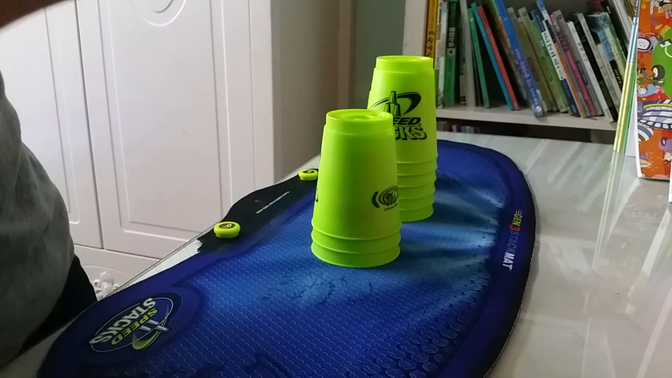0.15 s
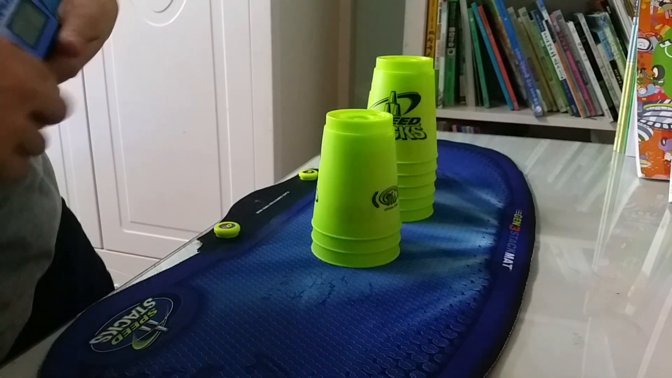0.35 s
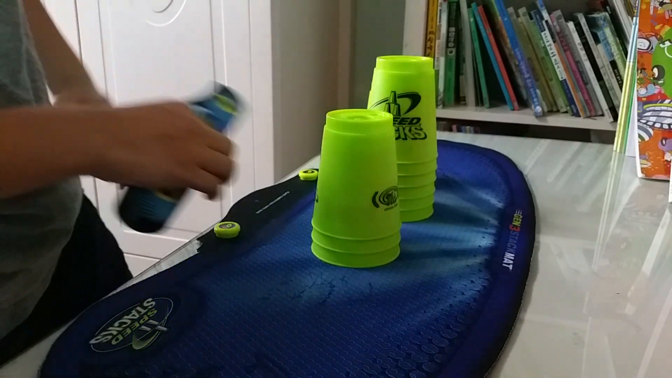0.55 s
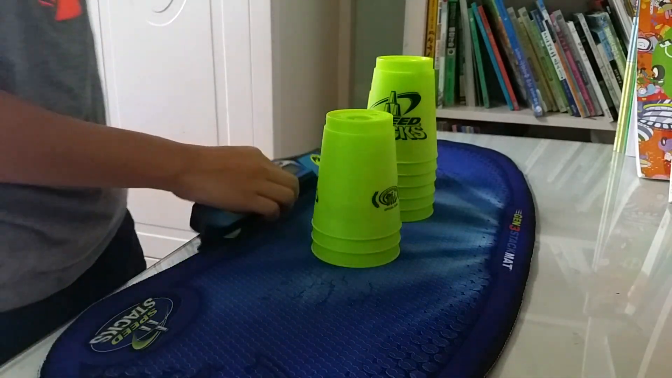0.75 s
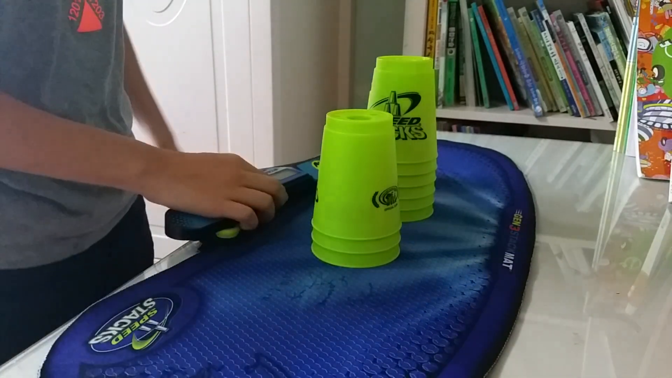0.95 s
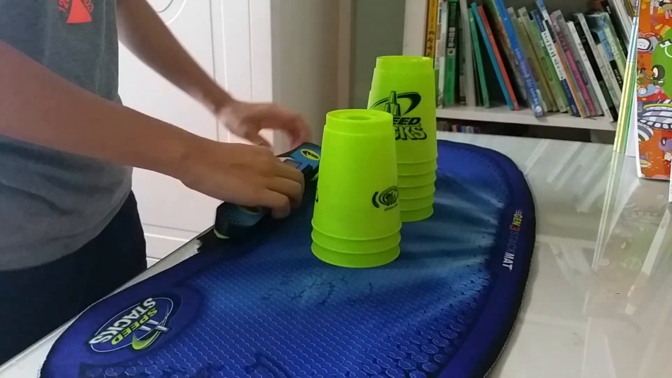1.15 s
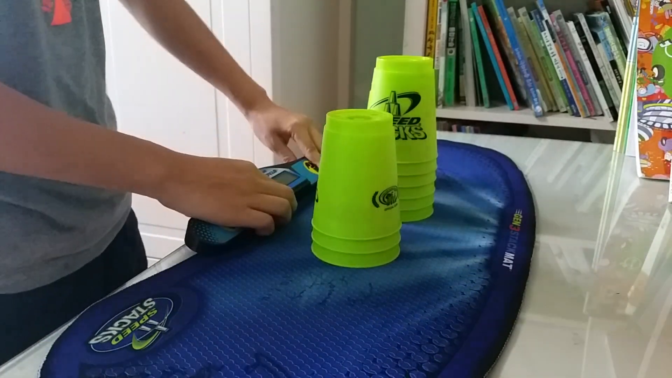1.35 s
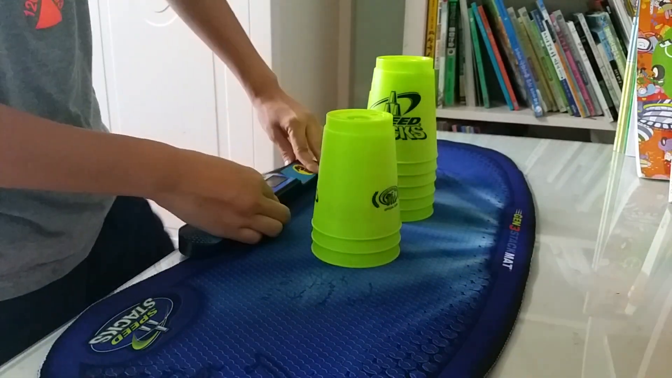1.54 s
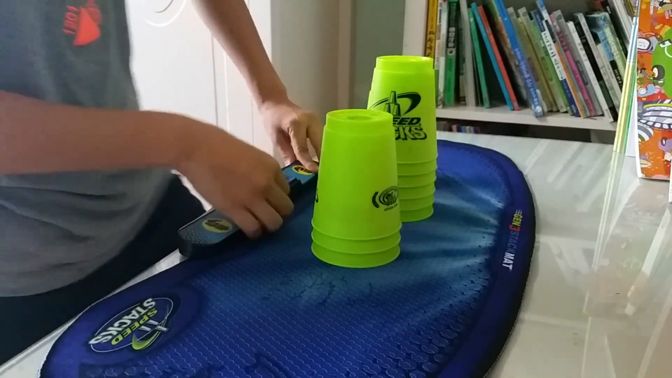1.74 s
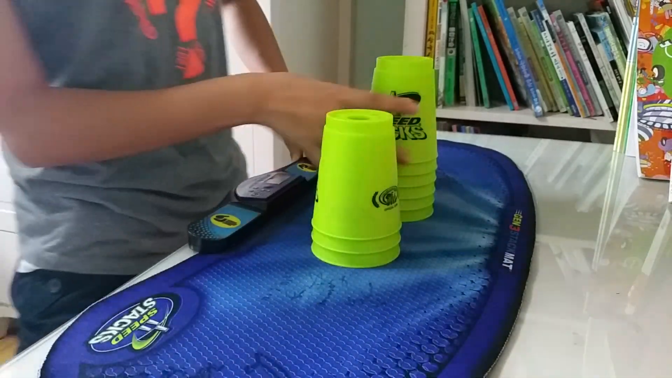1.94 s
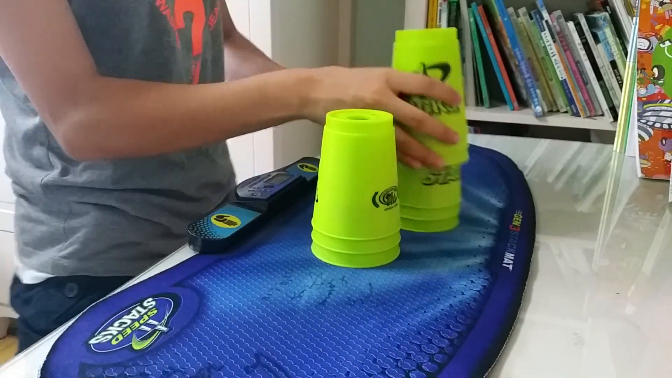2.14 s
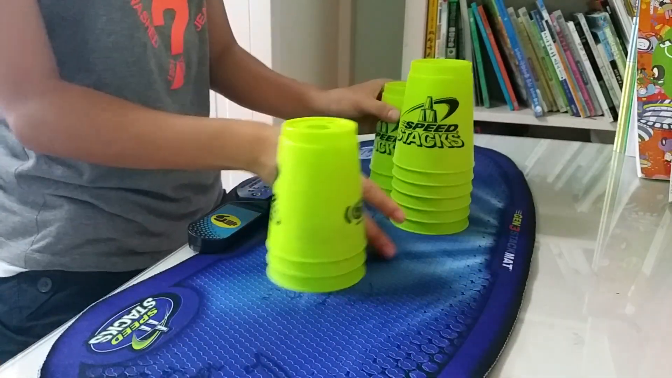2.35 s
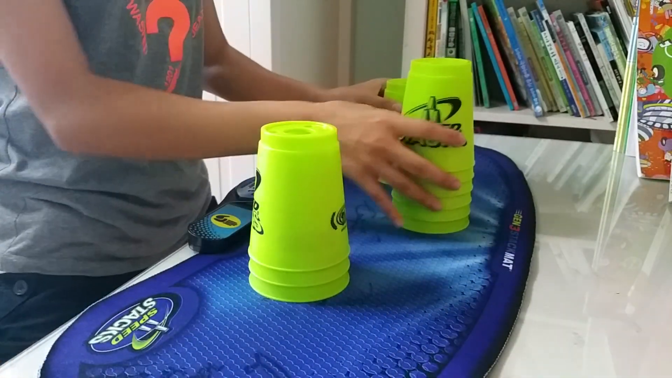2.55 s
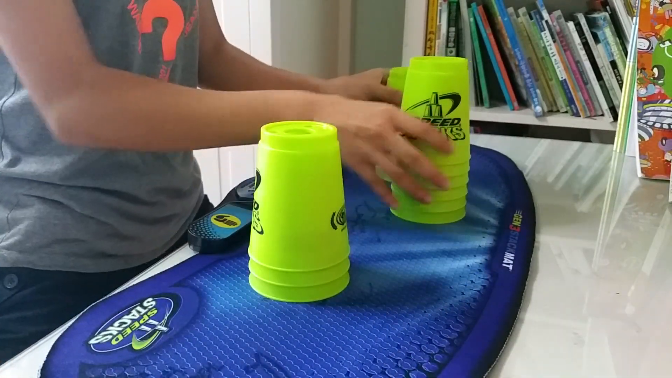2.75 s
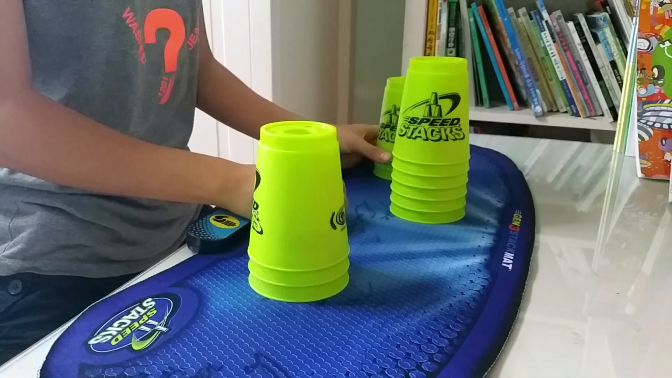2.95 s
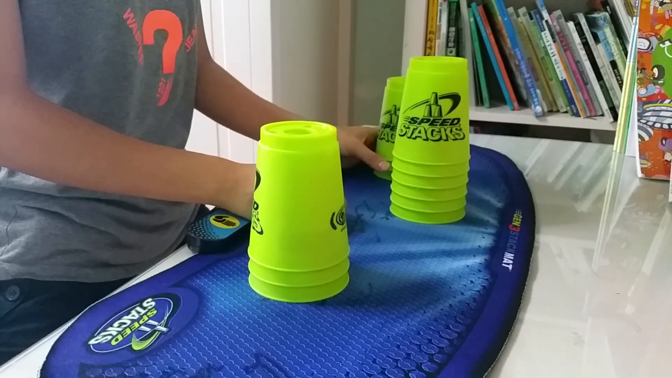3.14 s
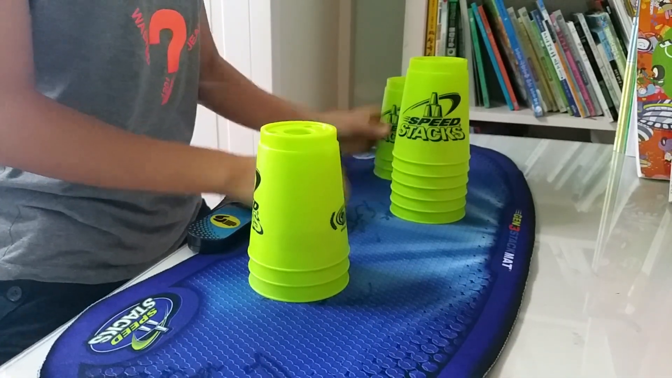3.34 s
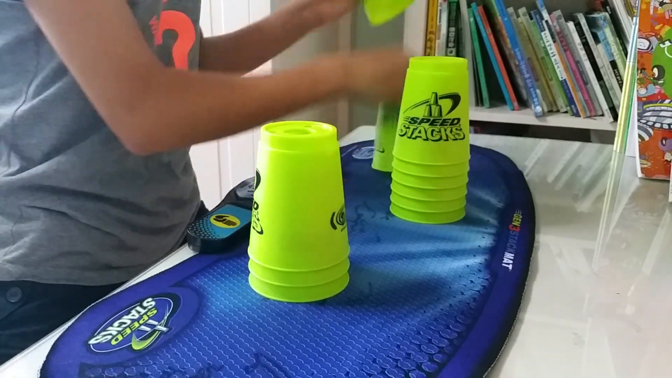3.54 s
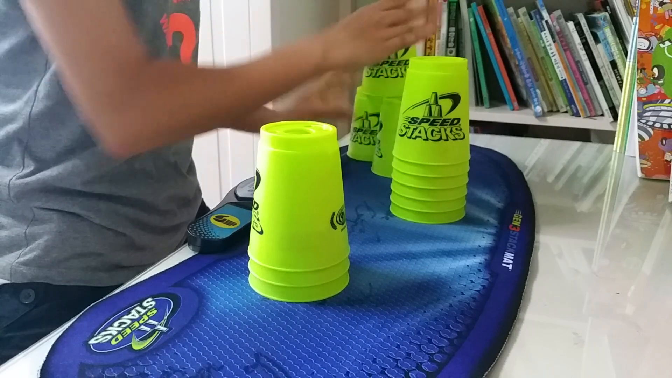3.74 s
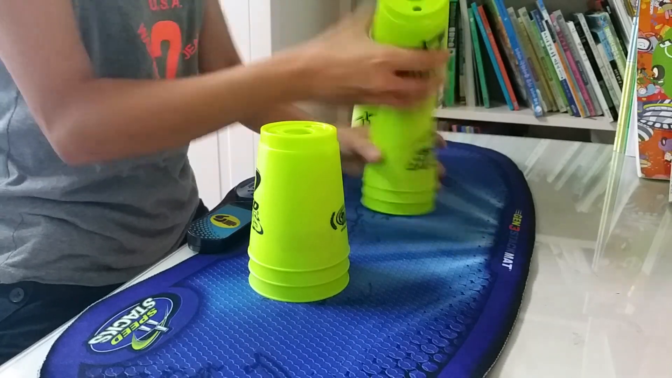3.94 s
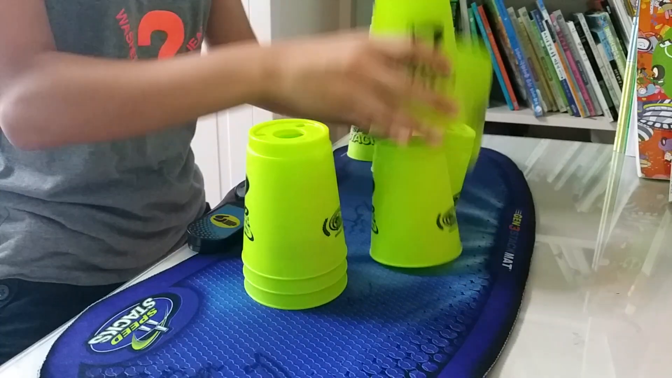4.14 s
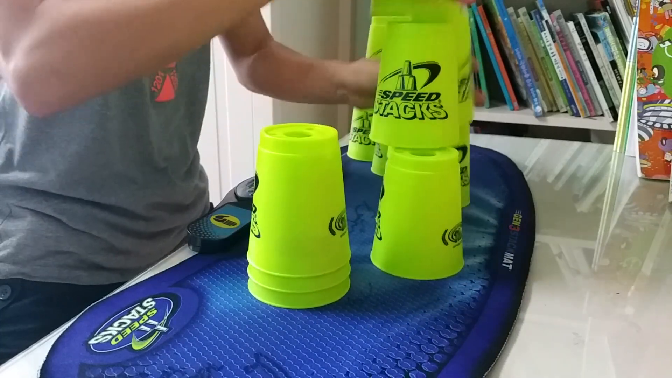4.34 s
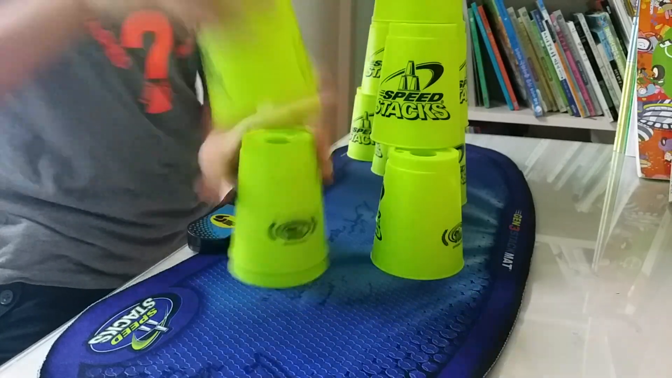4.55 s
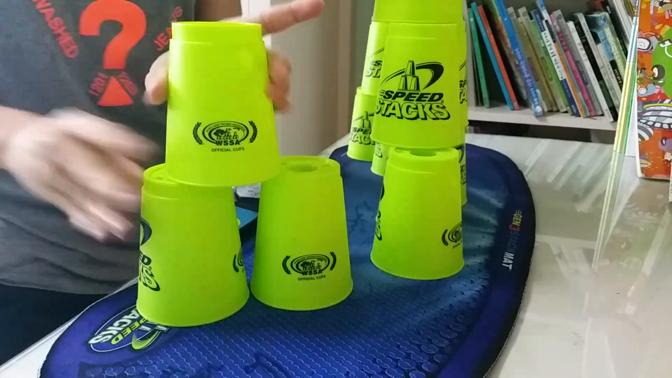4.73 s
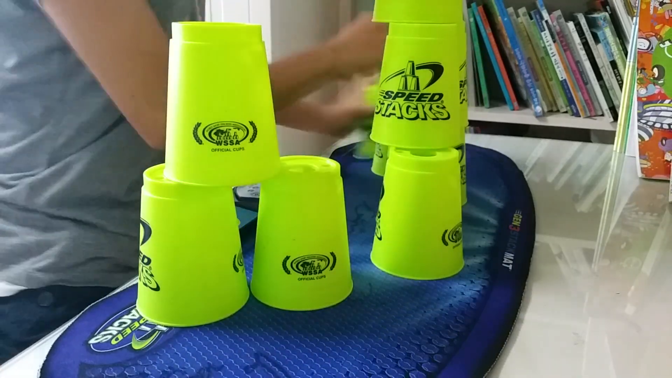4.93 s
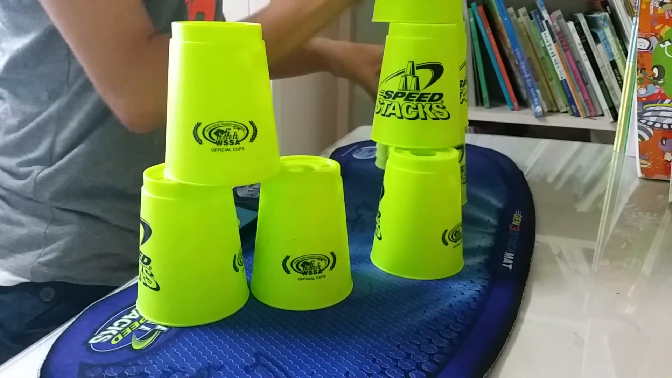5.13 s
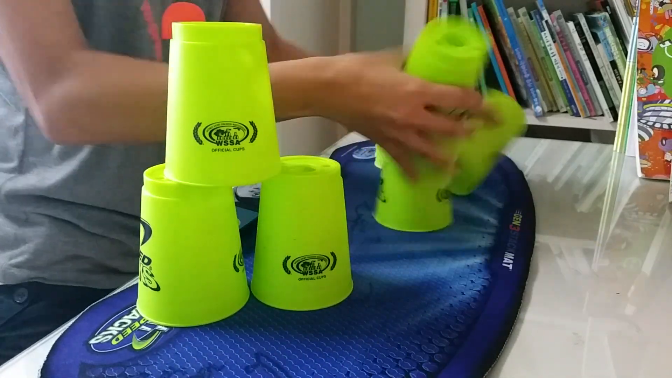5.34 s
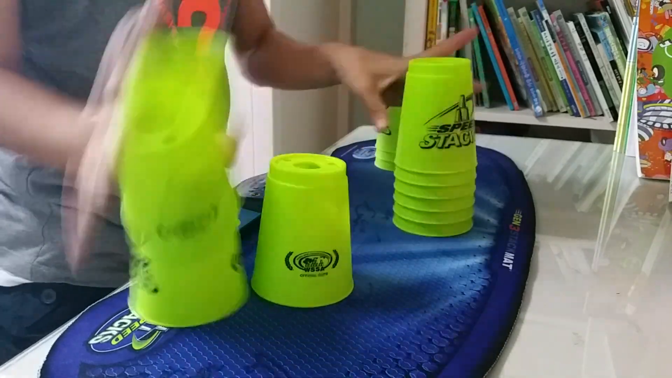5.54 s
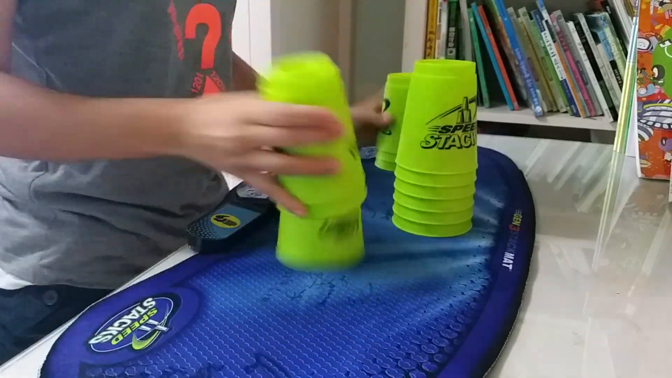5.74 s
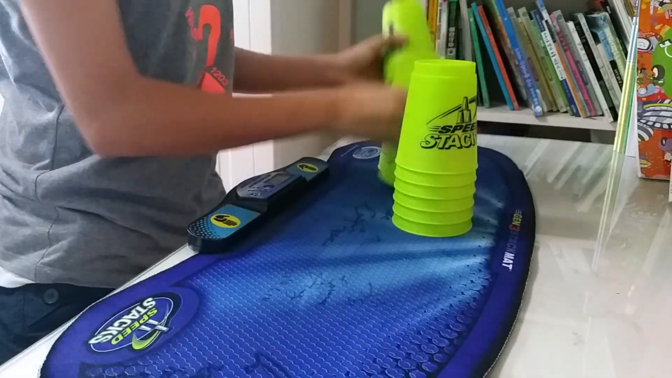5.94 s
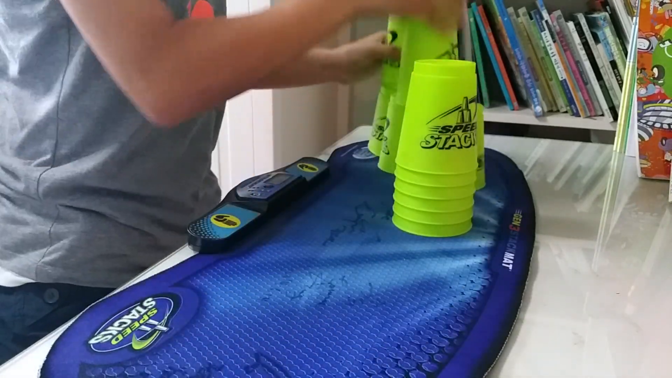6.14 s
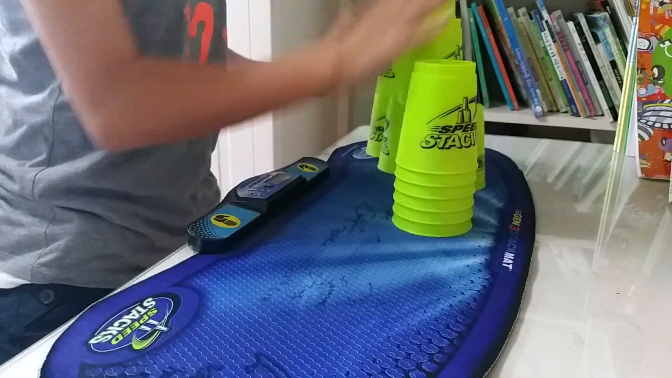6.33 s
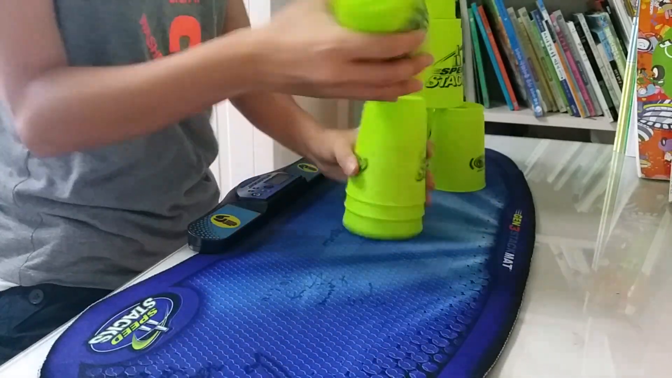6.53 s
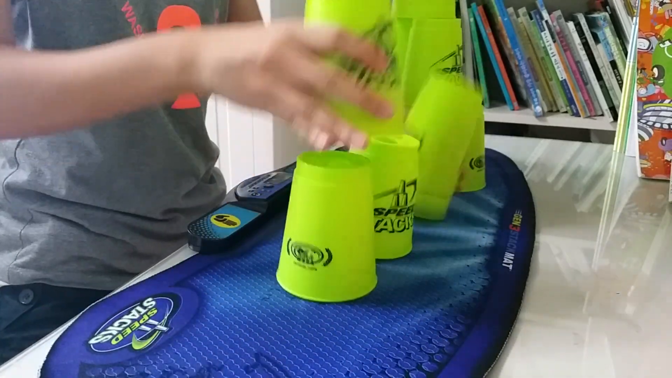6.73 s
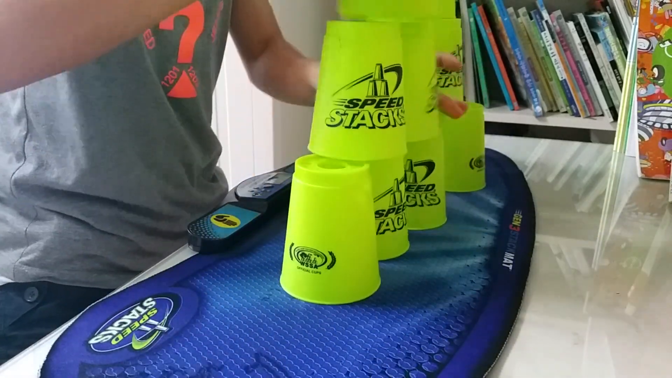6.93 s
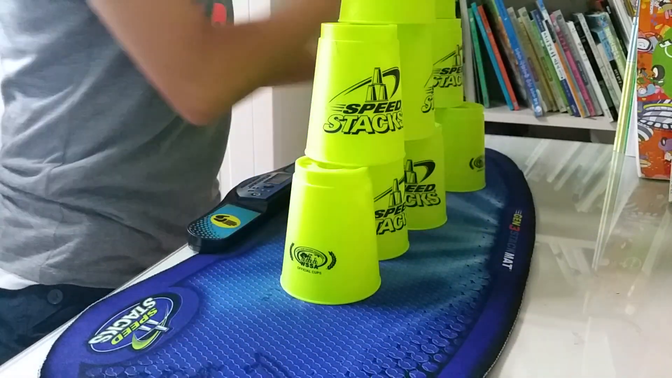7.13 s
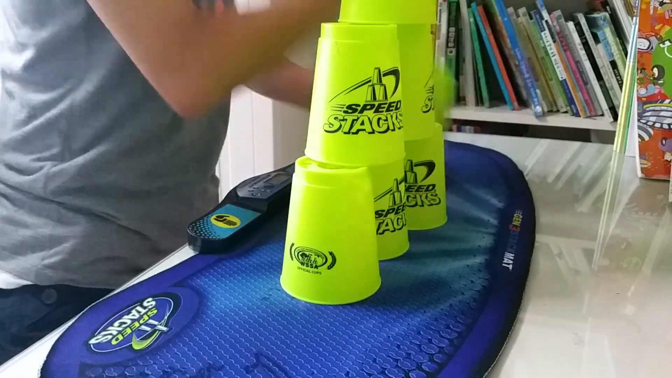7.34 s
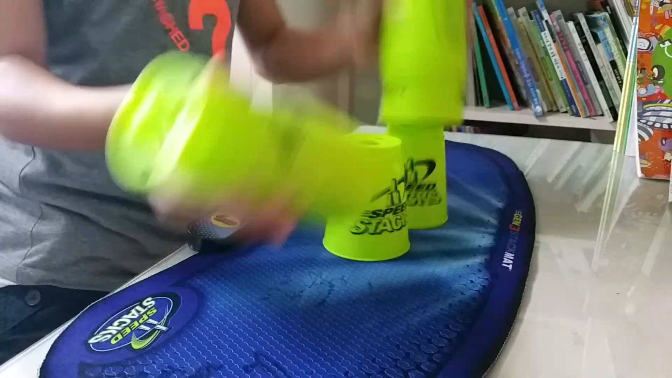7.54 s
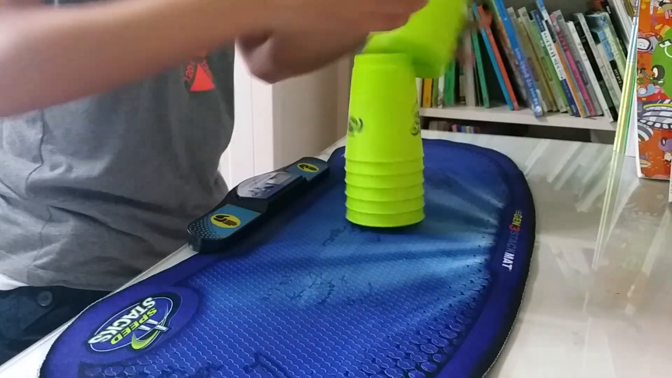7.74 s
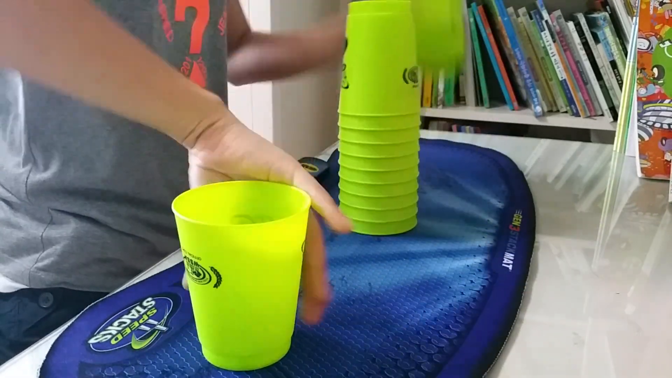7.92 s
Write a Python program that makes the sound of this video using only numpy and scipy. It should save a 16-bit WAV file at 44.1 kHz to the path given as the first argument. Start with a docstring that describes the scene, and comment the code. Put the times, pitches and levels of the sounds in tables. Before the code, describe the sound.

A small furnished room, heard in close stereo, has a low murmur and faint hiss. Only tiny ticks occur until about 0.8 s, when a plastic timer lands with a double clunk, then rattles and knocks on the table from 1.2 to 1.7 s. After a brief lull, a strong hollow pop and soft thud at 2.35 s marks cups being moved, with another pair around 3.0 s. From 3.8 s stacking begins: quick airy pops, each at a different pitch, with hard clacks and muted thuds. Between 5.1 and 5.7 s it is brighter and denser, with short grainy slides as cups nest. It eases near 6.0 to 6.6 s with weaker, sparser taps, picks up at 6.8 to 7.1 s, pauses briefly, then peaks in a crowded clatter from 7.3 to 7.7 s. Lighter taps trail off to 8 s. Short room reflections follow each hit.

```python
"""Fast airy pops, plastic clacks and soft thuds: cups stacked and unstacked on a mat on a light table.
A timer is set down first; a quiet hum and hiss of a small furnished room lie underneath.
Pops are short ringing air modes, clacks are noise bursts with wall modes, thuds are table and leg modes,
slides are gated grainy noise. A decaying noise tail adds the room; two close microphones pick it up."""
import sys
import numpy as np
from scipy import signal
from scipy.fft import rfft, irfft, next_fast_len
from scipy.io import wavfile
from scipy.ndimage import map_coordinates

SR = 44100
rng = np.random.default_rng(int(sys.argv[2]) if len(sys.argv) > 2 else 0)


def pcm_store(signal):
    """Save signal as 16-bit PCM."""
    levels = np.round(np.clip(np.atleast_2d(signal), -1, 1) * 32767)
    wavfile.write(sys.argv[1], SR, levels.astype(np.int16).T)


N = 356328

# Low hollow pops of the timer, the hands and then the cups. Each row: start in seconds, level in dB, pitch in Hz.
POP_EVENTS = [(0.832, -31, 330), (1.208, -28, 980), (1.395, -27, 338), (1.585, -35, 930),
              (2.262, -27.5, 425), (2.357, -5, 385), (2.659, -31.5, 401), (2.952, -7, 334),
              (3.026, -14.5, 342), (3.522, -31, 490), (3.644, -31.5, 310), (3.768, -24.5, 331),
              (3.802, -5, 677), (3.82, -4, 550), (3.844, -10.5, 555), (3.905, -14.5, 533),
              (4.092, -18, 503), (4.237, -5, 662), (4.328, -6, 720), (4.401, -7, 876), (4.471, -25.5, 890),
              (4.501, -0.5, 588), (4.695, -14, 824), (4.702, -18, 430), (4.824, -6.5, 707),
              (4.854, -7, 478), (5.07, -11.5, 460), (5.099, -24, 660), (5.129, -13, 403),
              (5.232, -17.5, 1020), (5.32, -11.5, 562), (5.357, -12, 724), (5.381, -8.5, 400),
              (5.421, -13, 450), (5.481, -18.5, 990), (5.579, -27, 524), (5.667, -7.5, 503),
              (5.695, -15, 640), (5.831, -12, 690), (5.902, -31.5, 425), (5.931, -23.5, 423),
              (6.087, -33.5, 760), (6.166, -15, 695), (6.233, -31, 950), (6.252, -18, 510),
              (6.305, -30, 1000), (6.337, -29, 520), (6.376, -8.5, 524), (6.558, -31, 348),
              (6.634, -27.5, 480), (6.661, -24, 900), (6.799, -6, 769), (6.892, -6.5, 434),
              (6.952, -20, 899), (6.978, -12.5, 430), (7.009, -21.5, 870), (7.044, -13, 860),
              (7.066, -2.5, 500), (7.295, -13.5, 440), (7.378, -4, 380), (7.458, -7, 454), (7.496, -8, 740),
              (7.572, -5, 477), (7.588, -11.5, 845), (7.613, -6.5, 657), (7.695, -12.5, 690),
              (7.817, -16, 470), (7.869, -29, 860), (7.975, -32, 513), (8.024, -22.5, 458)]
# Extra knocks of a cup base or timer, faint to strong. Each row: start in seconds, level in dB.
BASE_KNOCKS = [(0.833, -40), (1.209, -43), (2.356, -14), (3.844, -26), (4.501, -17), (4.854, -17),
               (5.129, -32), (5.667, -16), (5.931, -30.5), (6.336, -32.5), (6.376, -20), (6.978, -29),
               (7.008, -20), (7.066, -21.5), (7.09, -11.5), (7.295, -29), (7.572, -17.5), (7.695, -23.5)]
# Hard plastic clacks. Each row: start in seconds, level in dB, wall pitch in Hz, wall ring in dB over the clack.
CLACK_EVENTS = [(0.248, -53, 1500, -3), (0.3492, -50, 2960, -3), (0.435, -56, 2900, -22),
                (0.519, -44.5, 2590, -22), (0.8271, -18.5, 1800, -1), (0.885, -21, 1840, 1),
                (1.1614, -38, 2440, 2.5), (1.2098, -23, 1540, 3.5), (1.218, -21, 1540, -5),
                (1.248, -31.5, 1590, 10.5), (1.368, -20.5, 2920, -7), (1.391, -24, 1370, 3.5),
                (1.5795, -28, 2110, 5), (1.6782, -31, 1680, -2.5), (1.8184, -54, 1360, 10.5),
                (2.0263, -54, 1490, 13.5), (2.0664, -54.5, 1470, 14.5), (2.3302, -32, 2800, -8),
                (2.3573, -19, 1710, -0.5), (2.818, -50, 1500, 1), (2.9512, -24.5, 1535, 1.5),
                (3.0083, -22, 1420, -2), (3.127, -41, 1930, -28), (3.5204, -43.5, 1960, -12),
                (3.7043, -34, 1770, -22), (3.8018, -31.5, 1300, 3), (3.8217, -14.5, 1310, 0.5),
                (4.0153, -33.5, 1390, -21), (4.0565, -34, 1990, -30), (4.0913, -24, 1450, -12.5),
                (4.2352, -28, 2380, 2.5), (4.2444, -19, 2170, -21), (4.3306, -17, 1480, -7),
                (4.4004, -17.5, 1420, -0.5), (4.5008, -34, 1340, -13), (4.5059, -13.5, 2140, -6),
                (4.6834, -30, 2080, -26), (4.7041, -18, 1870, -9.5), (4.8267, -28.5, 1680, 2),
                (4.8519, -16.5, 1960, -8), (5.071, -32, 1360, -19), (5.132, -10.5, 1280, -1),
                (5.2342, -17.5, 1330, -10), (5.2435, -18, 1960, -20), (5.3203, -10.5, 2120, -10),
                (5.347, -7.5, 1956, -5), (5.3773, -12.5, 1950, -2), (5.447, -24, 2120, -17),
                (5.4805, -7, 2070, -10.5), (5.5333, -24, 1460, -1.5), (5.5956, -24, 2200, -13),
                (5.652, -38, 1570, -15), (5.67, -19, 1400, -10), (5.6962, -13, 2620, -9),
                (5.736, -23, 2270, 2), (5.8311, -24.5, 1380, -8.5), (5.862, -24.5, 2470, -25),
                (5.9313, -18.5, 1810, -1.5), (6.0887, -38.5, 1530, 5.5), (6.17, -31.5, 1640, -1),
                (6.2499, -31, 1500, 0), (6.374, -20.5, 1400, -2), (6.556, -39.5, 2100, -12),
                (6.6352, -22, 1930, -7), (6.6615, -33, 1620, -1), (6.804, -18, 1430, -2),
                (6.8974, -18.5, 1640, -1), (6.9503, -26.5, 1590, -14), (6.9778, -18, 1370, -0.5),
                (7.01, -27, 2100, -1), (7.0457, -25.5, 1900, -7), (7.0642, -23, 1670, -6),
                (7.081, -14.5, 1300, -2.5), (7.34, -17, 1560, -3), (7.3751, -12, 1520, -4.5),
                (7.457, -21.5, 1890, -23), (7.4955, -12.5, 1795, 2), (7.518, -20.5, 1920, 2.5),
                (7.5681, -14, 1350, -13), (7.5858, -13.5, 1600, -1), (7.6142, -14.5, 2200, -28),
                (7.6344, -8.5, 1840, -4.5), (7.6438, -25, 1920, -26), (7.6974, -7.5, 2190, -12),
                (7.7362, -22, 1454, 3), (7.8158, -23, 1360, -3), (7.869, -29, 1980, -5),
                (7.905, -56, 1900, -19), (7.925, -38, 1860, -21), (7.9712, -35, 1340, -34),
                (8.0224, -30, 1880, -2)]
# Blows into the table top. Each row: start in seconds, level in dB.
THUD_EVENTS = [(0.83, -10.5), (0.883, -11), (1.065, -29.5), (1.215, -15), (1.323, -26), (1.394, -10.5),
               (1.473, -25), (2.15, -32), (2.26, -27.5), (2.321, -25), (2.353, -6.5), (2.819, -27),
               (2.951, -19), (3.014, -5.5), (3.517, -35), (3.644, -31.5), (3.725, -30), (3.8, -16.5),
               (3.983, -29), (4.084, -26), (4.233, -18.5), (4.331, -20), (4.496, -29.5), (4.701, -17),
               (4.83, -27), (5.078, -18), (5.276, -26), (5.374, -12), (5.695, -22.5), (5.931, -20.5),
               (6.169, -28.5), (6.373, -28), (6.527, -39), (6.641, -28.5), (6.793, -22), (6.899, -20),
               (7.3, -20), (7.375, -7.5), (7.497, -17.5), (7.635, -11), (7.815, -30), (8.023, -27.5)]
# Hands and cup walls sliding. Each row: start in seconds, length in seconds, hiss in dB, hollow rush in dB.
SLIDE_EVENTS = [(1.166, 0.076, -48.5, -62), (1.221, 0.059, -48.5, -59), (1.366, 0.048, -38, -65),
                (1.523, 0.19, -53, -51), (2.02, 0.07, -63, -65), (2.349, 0.24, -58, -59),
                (3.106, 0.033, -56, -57), (3.463, 0.15, -66, -56), (3.679, 0.068, -54.5, -47.5),
                (4.02, 0.073, -55, -56), (4.118, 0.051, -56, -70), (4.489, 0.012, -29.5, -39),
                (4.668, 0.063, -41.5, -32), (4.833, 0.053, -38, -20.5), (5.061, 0.041, -48, -29.5),
                (5.106, 0.072, -34, -56), (5.219, 0.068, -34, -32), (5.288, 0.048, -43, -28),
                (5.358, 0.027, -31, -29.5), (5.41, 0.03, -36, -25), (5.478, 0.065, -39.5, -31),
                (5.58, 0.079, -55, -45.5), (5.701, 0.05, -33, -47), (5.84, 0.053, -69, -53),
                (6.16, 0.13, -54.5, -48), (6.616, 0.055, -40.5, -45.5), (6.89, 0.078, -48, -41),
                (6.985, 0.032, -42, -50), (7.048, 0.076, -36, -19.5), (7.281, 0.032, -41, -23.5),
                (7.305, 0.055, -26, -25.5), (7.374, 0.06, -35, -45), (7.455, 0.046, -37, -38),
                (7.497, 0.044, -33, -28), (7.571, 0.028, -23.5, -29), (7.637, 0.04, -31.5, -24),
                (7.715, 0.033, -34.5, -31), (7.855, 0.077, -58, -61)]
# Where the hands work. Each row: time in seconds, left-right of pops in dB, left-right of clacks in dB.
HAND_PLACES = [(.7, -2, -2.5), (2, 1, 0), (5, 1.5, -3.5), (8.08, 0, -2.5)]
# While the hands get ready: from, to in seconds.
HANDS_SPAN_S = (2.4, 4.0)
# Level of the whole background over time, with handling noise near 1.2 s.
# Each row: time in seconds, level of the murmur in dB.
BACKGROUND_LEVELS = [(0, -56), (.3, -49.5), (.8, -51.5), (1.2, -39), (1.9, -48.5), (2.1, -45.5), (3.4, -48),
                     (4.4, -47), (4.8, -55.5), (8.08, -55)]

# Low modes of the table top. Each row: frequency in Hz, relative level in dB, t60 in seconds.
TABLE_MODES = [(121.5, -3, 0.051), (131.1, -10.5, 0.45), (148.3, 2.5, 0.097)]
# Upper modes of the table top. Each row: frequency in Hz, relative level in dB, t60 in seconds.
EDGE_MODES = [(188.7, -1, 0.19), (208.4, 2.5, 0.16), (237.3, -15.5, 0.23), (348.5, -7.5, 0.14)]
# Modes of the table legs. Each row: frequency in Hz, relative level in dB, t60 in seconds.
LEG_MODES = [(45.5, -16, 0.094), (64.4, 8.5, 0.13), (87, 13, 0.1)]
# Struck wall. Each row: multiple of its pitch, relative level in dB, t60 in seconds.
WALL_MODES = [(.8, 7, 0.0074), (1, 7.5, 0.031), (1.25, -1.5, 0.014)]
# Enclosed air. Each row: multiple of the pitch, relative level in dB, t60 in seconds.
CAVITY_MODES = [(.75, -17, 0.0063), (1.001, 4, 0.019), (1.4, -5, .014)]
# Cup base. Each row: frequency in Hz, relative level in dB, t60 in seconds.
BASE_MODES = [(936, 0, 0.03), (1101, 9, 0.024), (1175, 8, 0.019), (1330, -17, 0.0035)]

# Body of rim contact. Each row: frequency in Hz, relative level in dB per Hz.
RIM_SPECTRUM = [(1180, -20.5), (2000, -1.5), (2760, -13), (3360, -7), (3770, -8), (4080, -4.5),
                (5600, -8.5), (7390, -6.5), (10000, -22), (13000, -21), (22000, -120)]
# Treble of rim contact. Each row: frequency in Hz, relative level in dB per Hz.
SHEEN_SPECTRUM = [(4710, -13), (8000, 4), (10400, -5), (15100, -5.5), (16000, -26)]
# Rush of air inside cups. Each row: frequency in Hz, relative level in dB per Hz.
HOLLOW_SPECTRUM = [(150, -18), (250, -6.5), (662, -1.5), (744, -4.5), (1000, 0.5), (1300, -41),
                   (2200, -120)]
# Loose plastic buzzing. Each row: frequency in Hz, relative level in dB per Hz.
RATTLE_SPECTRUM = [(700, -7), (1100, -0.5), (1900, -1), (2800, -2), (3500, -12.5), (5000, -41)]
# Rasp of sliding walls. Each row: frequency in Hz, relative level in dB per Hz.
RASP_SPECTRUM = [(470, -46), (800, 7.5), (992, 8.5), (1600, -17), (1760, -8), (2800, -43), (3640, -64),
                 (6160, -120)]
# Low room rumble. Each row: frequency in Hz, relative level in dB per Hz.
RUMBLE_SPECTRUM = [(15, -30), (25, -17), (38, -10), (53, 0), (70, -9), (100, -12), (140, -40)]
# Murmur of the house. Each row: frequency in Hz, relative level in dB per Hz.
MURMUR_SPECTRUM = [(70, 2), (100, 3.5), (131, 4.5), (200, 1), (300, -7), (450, -5.5), (650, -17), (950, -9),
                   (1500, -19.5), (2400, -33), (3200, -70)]
# Background hiss, rising and falling with the murmur. Each row: frequency in Hz, relative level in dB per Hz.
HISS_SPECTRUM = [(1200, -13), (2100, 2), (2900, -1), (3400, -8), (4300, 0), (5600, -14.5), (7200, -4.5),
                 (8300, -9), (9300, -44), (13000, -41), (16000, -29)]
# Likeness of the two microphones. Each row: frequency in Hz, left-right correlation from 0 to 1.
MIC_LIKENESS = [(40, 0.75), (100, 1), (250, 0.65), (500, 0.74), (1000, 0.054), (2500, 0.03), (10000, 0.012)]
# Colour difference of the ports. Each row: frequency in Hz, tilt in dB before the port share.
PORT_TILT = [(60, 2.5), (150, 0.5), (380, 5.5), (950, 4.5), (2380, 6.5), (5980, -4.5), (15000, 3.5)]
# Decay of the room. Each row: frequency in Hz, t60 in seconds.
ROOM_DECAY = [(150, 0.39), (420, 0.22), (1100, 0.29), (2900, 0.28), (7700, 0.28), (14000, 0.24)]

TIMER_UNTIL_S, CUP_THUDS_FROM_S = 2.1, 3.7
LONE_HZ, LONE_SPREAD_SHARE = 728, .06  # a single cup set flat on the mat pops near this pitch
KNOCK_DB, LONE_KNOCK_DB = -20, -35  # base knock under a pop: plastic on plastic, plastic on mat
LEGS_DB, HANDS_LEGS_DB = -40, -12.5  # usual; under hands dropped on the near edge
EDGE_DB, CUPS_EDGE_DB = -4.5, -1.5  # upper table modes in a -20.5 dB thud, before and after the cups land
EDGE_FADE_DB_PER_DB = 0.1  # lost with force
BRIGHT_DB, TIMER_BRIGHT_DB = -20, -19.5  # treble term of a -24.5 dB clack with 0 dB wall ring; of the timer
DULLING_DB_PER_DB, FLAT_DULLING_DB_PER_DB = 0.14, 0.22  # treble lost with force, and with wall ring (flat blow)
UNSTEADY_DB = 5.5  # depth of random unevenness in the wall rings
RASP_DB, RASP_GROWTH_DB_PER_DB = -2, 0.24  # over the hiss of a -40 dB slide; gained with hiss level
CATCH_DB = 3.5  # depth of catch and slip
TICKS_PER_S, TICK_DB, TICK_SPREAD_DB = 220, 3, 4  # rim knocks in a slide, level over the rasp stroke
RUMBLE_DB, HISS_DB = -10.5, -13  # relative to the murmur
CEILING, TOP_HZ = .92, 15850  # full scale = 1; band limit


def amp(db):
    """Decibels to amplitude."""
    return 10 ** (np.asarray(db) / 20)


def unit(x):
    """Scale to rms 1."""
    return x / np.sqrt(np.mean(x ** 2) + 1e-20)


def along(points, hz):
    """Interpolate (Hz, value) points on a log frequency axis."""
    point_hz, value = np.transpose(points)
    return np.interp(np.log(hz + 1), np.log(point_hz + 1), value)


def curves(rows):
    """One value per sample for each column after the time."""
    when_s, *columns = np.transpose(rows)
    return [np.interp(np.arange(N) / SR, when_s, column) for column in columns]


def wobble(knots_per_s):
    """A smooth random curve through normal random knots."""
    knots = rng.standard_normal(int(N * knots_per_s / SR) + 4)
    return map_coordinates(knots, [np.arange(N) * knots_per_s / SR])


def filtered(x, response):
    """Multiply the spectrum of x by a response of frequency."""
    size = next_fast_len(x.shape[-1] + 8192)
    spectrum = rfft(x, size) * response(np.fft.rfftfreq(size, 1 / SR))
    return irfft(spectrum, size)[..., :x.shape[-1]]


def paired(two, spectrum):
    """Mix two unrelated signals to the likeness of the two microphones, and colour them."""
    def response(hz):
        turn = np.arccos(np.clip(along(MIC_LIKENESS, hz), 0, 1)) / 2
        return amp(along(spectrum, hz)) * [np.cos(turn), np.sin(turn)]

    mid, side = filtered(two, response)
    return np.array([mid + side, mid - side])


def noise(spectrum):
    """Stereo coloured noise of rms 1."""
    return unit(paired(rng.standard_normal((2, N)), spectrum))


def ring(modes, t, attack_s):
    """Decaying sine modes struck together, each at a random strength and slightly detuned."""
    draws = rng.standard_normal((len(modes), 2)) * [2.5, .02]  # dB, share of pitch
    total = 0
    for (hz, db, t60_s), (extra_db, detune) in zip(modes, draws):
        envelope = amp(db + extra_db - 60 * t / t60_s)
        total = total + envelope * np.sin(2 * np.pi * hz * (1 + detune) * t)
    return total * (1 - np.exp(-t / attack_s))


def scaled(modes, pitch_hz):
    """Turn multiples of a pitch into Hz."""
    return [(pitch_hz * multiple, db, t60_s) for multiple, db, t60_s in modes]


def add(out, s, sound, pan_db):
    """Lay a sound into the stereo track, louder on the left for positive pan."""
    at = round(s * SR)
    out[:, at:at + sound.shape[-1]] += sound * amp([[pan_db / 2], [-pan_db / 2]])


def place(s):
    """Left-right dB of pops and clacks at a moment."""
    when_s, *sides_db = np.transpose(HAND_PLACES)
    return [np.interp(s, when_s, side_db) for side_db in sides_db]


def tone():
    """Background: coloured noises for low rumble, soft murmur and hiss, sharing one level, each wavering."""
    murmur_db, = curves(BACKGROUND_LEVELS)
    rumble = amp(murmur_db + RUMBLE_DB + 0.81 * wobble(3.66)) * noise(RUMBLE_SPECTRUM)
    murmur = amp(murmur_db + 1.1 * wobble(4.17)) * noise(MURMUR_SPECTRUM)
    hiss = amp(murmur_db + HISS_DB + 0.46 * wobble(2.36)) * noise(HISS_SPECTRUM)
    return rumble + murmur + hiss


def room(x, size=8192):
    """Each frequency dies at its own speed; each block of time gets a freshly drawn noise tail."""
    out = np.zeros((2, N + SR))
    for at in range(0, N, size):
        hz, t, bins = signal.stft(rng.standard_normal((2, SR // 2)), SR, nperseg=256)
        decay = amp(-60 * t / along(ROOM_DECAY, hz)[:, None])
        tail = signal.istft(bins * decay, SR, nperseg=256)[1]
        tail = paired(tail, [(100, 1.5), (1000, -1.0), (10000, -1.2)])  # Hz, dB
        wet = signal.fftconvolve(x[None, at:at + size], tail / np.linalg.norm(tail[0]), axes=1)
        add(out, at / SR + .004, wet[:, :SR // 2 + size], 0)
    return out[:, :N]


def thuds():
    """The mat softens the blow, so the table top and legs swell into their ring."""
    out, t = np.zeros((2, N + SR)), np.arange(SR // 2) / SR
    for s, db in THUD_EVENTS:
        legs_db = HANDS_LEGS_DB if HANDS_SPAN_S[0] < s < HANDS_SPAN_S[1] else LEGS_DB
        edge_db = EDGE_DB if s < CUP_THUDS_FROM_S else CUPS_EDGE_DB
        edge_db -= EDGE_FADE_DB_PER_DB * (db + 20.5)
        top = amp(-2.0) * ring(TABLE_MODES, t, 0.0057)
        edge = amp(edge_db) * ring(EDGE_MODES, t, 0.01)
        legs = amp(legs_db) * ring(LEG_MODES, t, 0.013)
        add(out, s, amp(db) * (top + edge + legs), .6)
    return out[:, :N]


def grit():
    """Uneven level of walls that catch and slip, rms 1."""
    return unit(amp(CATCH_DB * wobble(300) + wobble(40)))


def rubbing():
    """Sliding plastic: grainy hiss, small ticks, a rasp of the walls and a hollow rush from inside the cups."""
    t = np.arange(N) / SR
    strokes = np.zeros((3, N))
    for s, length_s, hiss_db, hollow_db in SLIDE_EVENTS:
        rasp_db = hiss_db + RASP_DB + RASP_GROWTH_DB_PER_DB * (hiss_db + 40)
        at = slice(round(s * SR), round((s + length_s + .05) * SR))
        since_s = t[at] - s
        rise = np.clip(since_s / (0.0058 + 0.33 * length_s), 0, 1)
        release = np.exp(-np.clip(since_s - length_s, 0, 1) / 0.0061)
        strokes[:, at] += np.outer(amp([hiss_db, rasp_db, hollow_db]), rise * release)
    hiss_stroke, rasp_stroke, hollow_stroke = strokes

    hiss = hiss_stroke * grit() * (noise(RIM_SPECTRUM) + 0.45 * noise(SHEEN_SPECTRUM))
    struck = rng.random(N) < TICKS_PER_S / SR
    impulses = struck * amp(TICK_SPREAD_DB * rng.standard_normal(N)) * rasp_stroke
    decay = amp(-60 * t[:SR // 20] / 0.019)
    ticks = amp(TICK_DB) * signal.fftconvolve(impulses, decay)[:N] * noise(RATTLE_SPECTRUM)
    rasp = rasp_stroke * grit() * noise(RASP_SPECTRUM)
    hollow = hollow_stroke * grit() * noise(HOLLOW_SPECTRUM)
    return hiss + ticks + rasp + hollow


def clacks():
    """Hard contact: a sharp click, a short noisy chatter, and the ring of the wall or buzz of the timer case."""
    t = np.arange(SR // 8) / SR
    body, top, buzz, walls = np.zeros((4, 2, N + SR))
    impulses = np.zeros((2, N))
    burst = amp(-60 * t / 0.023) + 0.16 * amp(-60 * t / 0.056)  # first contact, then the rims chatter
    for s, db, hz, wall_db in CLACK_EVENTS:
        if s < TIMER_UNTIL_S:  # the timer case mostly buzzes
            bright_db, ring_db, buzz_db = TIMER_BRIGHT_DB, -17, -3
        else:  # a cup wall rings
            bright_db = BRIGHT_DB - DULLING_DB_PER_DB * (db + 24.5) - FLAT_DULLING_DB_PER_DB * wall_db
            ring_db, buzz_db = -5, -9
        pan_db = place(s)[1]
        wall = ring(scaled(WALL_MODES, hz), t, 0.00022)
        add(body, s, amp(db - 7.0) * burst, pan_db)
        add(top, s, amp(db + bright_db + 6.5) * burst, pan_db)
        add(walls, s, amp(db + wall_db + ring_db) * wall, pan_db)
        add(buzz, s, amp(db + wall_db + buzz_db - 60 * t / 0.091), pan_db)
        impulses[:, round(s * SR) + 4] += amp([db + 19.5, db + bright_db + 25.5])  # rim, sheen
    click = filtered(impulses, lambda hz: amp([along(RIM_SPECTRUM, hz), along(SHEEN_SPECTRUM, hz)])).sum(axis=0)
    chatter = body[:, :N] * noise(RIM_SPECTRUM) + top[:, :N] * noise(SHEEN_SPECTRUM)
    rattle = buzz[:, :N] * noise(RATTLE_SPECTRUM)
    wall_ring = walls[:, :N] * unit(amp(UNSTEADY_DB * wobble(220)))
    return chatter + rattle + wall_ring, click


def pops():
    """Enclosed air rings a few cycles, higher the deeper a cup is nested; the base knocks and air puffs out."""
    out, puff = np.zeros((2, 2, N + SR))
    t = np.arange(SR // 8) / SR
    for s, db, hz in POP_EVENTS:
        pan_db = place(s)[0]
        lone = abs(hz / LONE_HZ - 1) < LONE_SPREAD_SHARE
        air = ring(scaled(CAVITY_MODES, hz), t, 0.00095)
        base = amp(LONE_KNOCK_DB if lone else KNOCK_DB) * ring(BASE_MODES, t, 0.0024)
        add(out, s, amp(db) * (air + base), pan_db)
        add(puff, s, amp(db - 10.0 - 60 * t / 0.053) * (1 - np.exp(-t / 0.0012)), pan_db)
    for s, db in BASE_KNOCKS:
        add(out, s, amp(db) * ring(BASE_MODES, t, 0.002), place(s)[0])
    return out[:, :N] + puff[:, :N] * noise(HOLLOW_SPECTRUM)


def scene():
    """Direct sounds plus their room tail, over the background; clicks reach the mix only through the room."""
    table, rub, (rims, click), air = thuds(), rubbing(), clacks(), pops()
    direct = air + rims + table + rub
    send = amp(-3.5) * air + amp(-2.5) * rims + click + amp(-10.0) * table + amp(-13) * rub
    hits = direct + room(send.mean(axis=0))
    # the hits carry almost nothing below about 40 Hz
    radiated = filtered(hits, lambda hz: 1 / (1 + (42 / (hz + 1)) ** 6))
    return radiated + tone()


def record(dry):
    """The two ports differ in colour, loud peaks are rounded off, nothing is kept above the band limit."""
    port_shares = [.3, -.3]  # left, right
    ports = filtered(dry, lambda hz: amp(np.outer(port_shares, along(PORT_TILT, hz))))
    rounded = ports / (1 + np.abs(ports / CEILING) ** 4) ** (1 / 4)
    return filtered(rounded, lambda hz: hz < TOP_HZ)


dry = scene()
out = record(dry)
pcm_store(out)
```